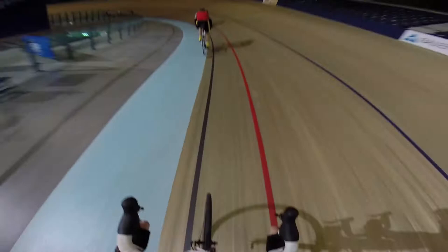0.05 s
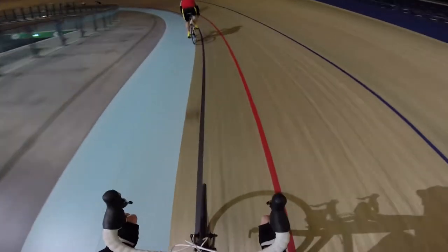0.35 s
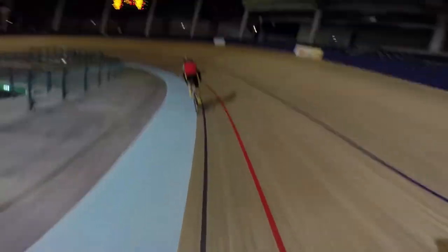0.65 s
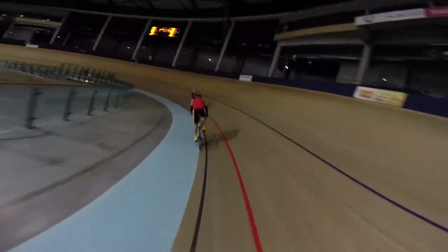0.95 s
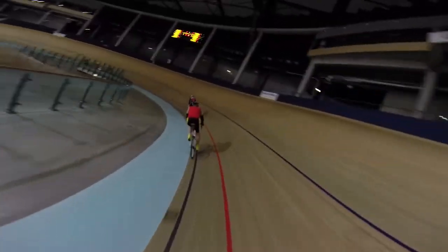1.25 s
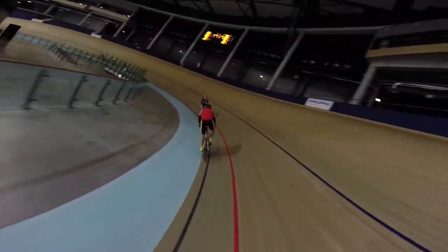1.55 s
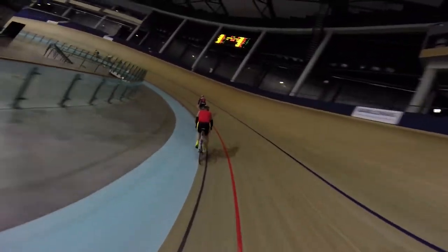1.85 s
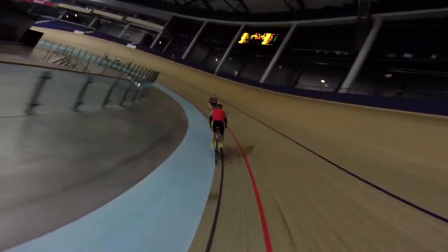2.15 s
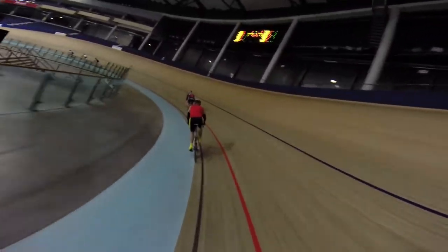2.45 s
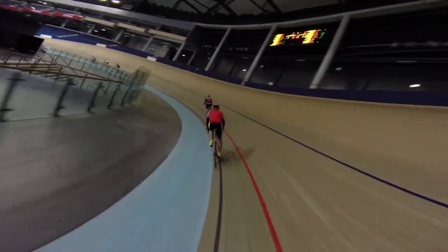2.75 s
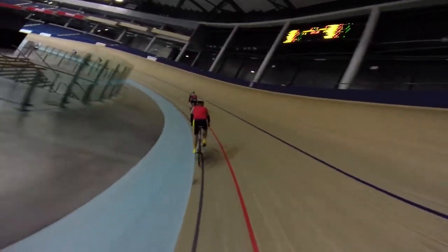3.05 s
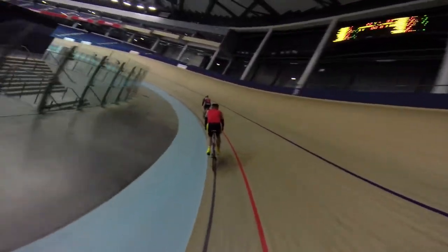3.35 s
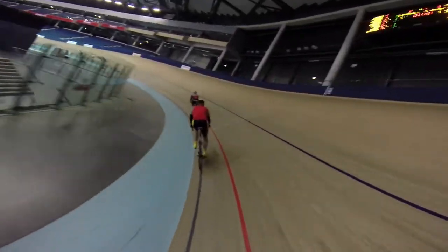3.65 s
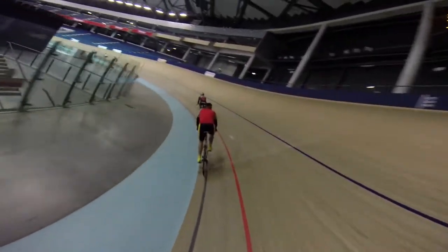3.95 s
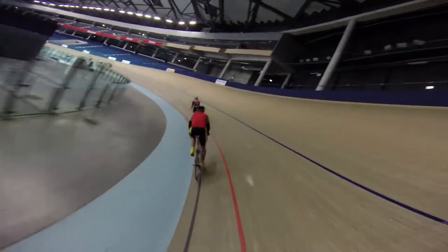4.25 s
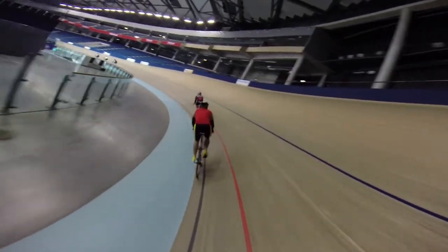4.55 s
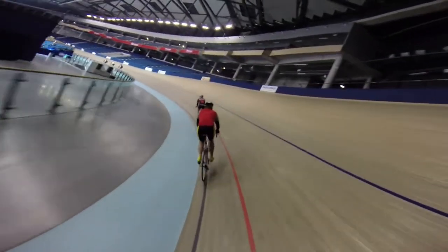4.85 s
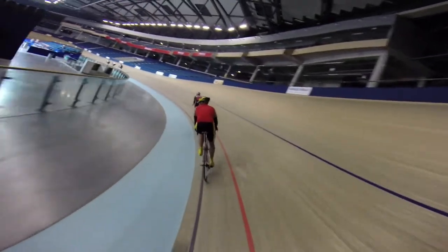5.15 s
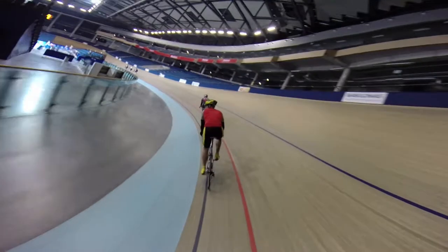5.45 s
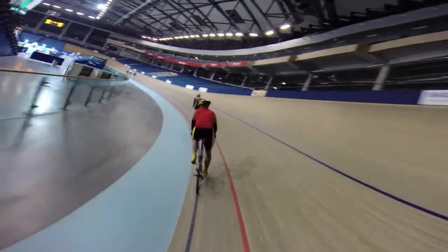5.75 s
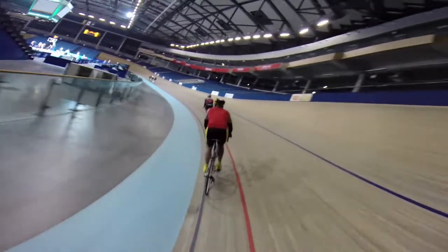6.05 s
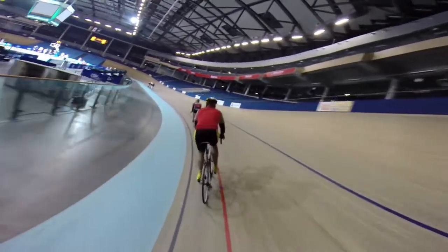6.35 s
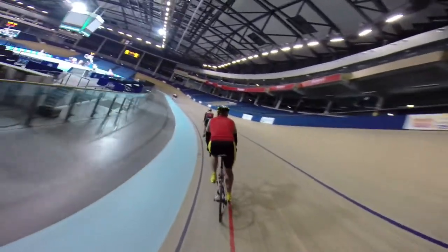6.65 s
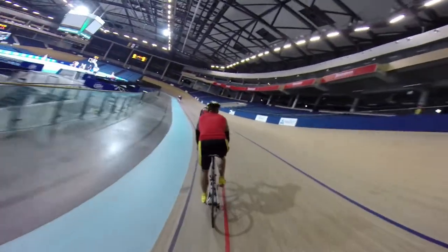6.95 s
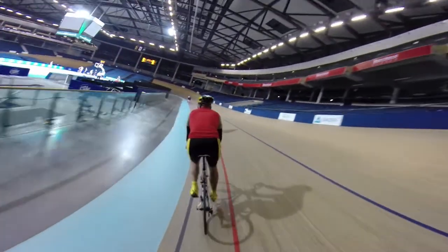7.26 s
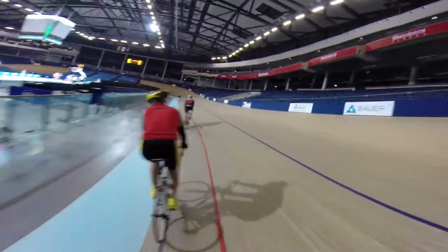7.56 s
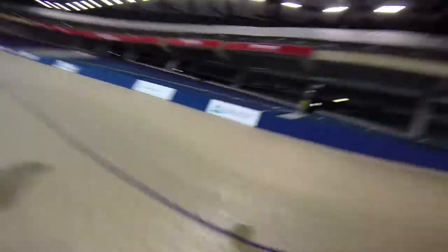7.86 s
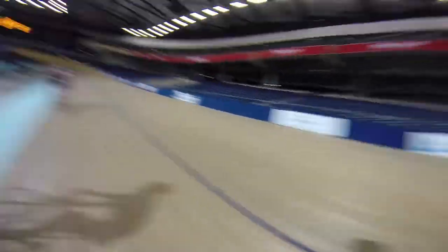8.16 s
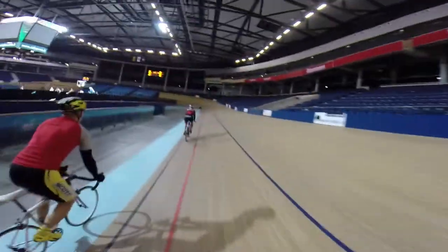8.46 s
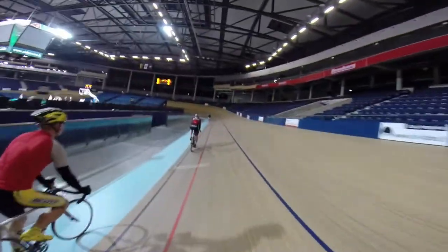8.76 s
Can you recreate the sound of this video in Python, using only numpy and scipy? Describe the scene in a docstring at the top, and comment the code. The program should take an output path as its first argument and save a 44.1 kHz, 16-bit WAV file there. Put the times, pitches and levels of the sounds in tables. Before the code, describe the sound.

Bicycle tyres roar softly on wooden boards under thumping, fluttering wind on a helmet microphone, with a few faint clicks.

```python
"""Wind buffets a helmet camera as it rides at speed round a wooden indoor cycle track.
Swirls of air thump the camera's case and flutter in its hollows. Air hisses past edges and
whistles across a gap, and it rushes brighter when the head turns.
Underneath, tyres roll on the boards, the bike ticks and squeaks faintly,
and the camera's electronics whine."""
import sys
import numpy as np
from scipy import signal
from scipy.fft import rfft, irfft, next_fast_len
from scipy.io import wavfile
from scipy.ndimage import uniform_filter1d

SR = 44100
rng = np.random.default_rng(int(sys.argv[2]) if len(sys.argv) > 2 else 0)


def inscribe(sig):
    """Save sig as 16-bit PCM at rate SR to the path in sys.argv[1].

    A 1-D sig is mono; a 2-D sig holds one channel per row.
    Samples are clipped to [-1, 1] before scaling.
    """
    pcm = np.round(np.clip(np.atleast_2d(sig).T, -1, 1) * 32767)
    wavfile.write(sys.argv[1], SR, pcm.astype(np.int16))


N = 397782
TIME = np.arange(N) / SR

# Levels in the tables are relative: the functions scale and filter them further.
# strength of the big swirls of air: time_s, level_db
SWIRL_LEVELS = [(0, -21), (.5, -27), (1.0, -23.5), (2.1, -26), (2.62, -19.5), (2.9, -27), (4.4, -23),
                (5.6, -25), (7.0, -22), (7.6, -23.5), (8.2, -20.5), (9.02, -24.5)]
# tone of the big swirls: pitch_hz, level_db
SWIRL_SPECTRUM = [(6, -6.5), (12, 1.5), (18, 9.5), (26, -5.5), (38, -6.5), (50, -8.5), (75, -18),
                  (110, -40), (250, -48)]
# boom of the case between thumps: time_s, level_db
BOOM_LEVELS = [(0, -27), (.5, -25.5), (1.65, -20), (2.08, -26.5), (2.35, -19.5), (2.9, -22), (4.4, -21.5),
               (5.0, -26), (5.3, -20.5), (5.72, -17.5), (6.05, -25), (6.45, -25), (6.85, -17.5), (7.5, -23),
               (7.95, -26), (9.02, -21.5)]
# single swirls that thump the case: time_s, level_db
CASE_THUMPS = [(.09, -15), (.33, -17), (.88, -18), (1.18, -16), (1.31, -19), (1.41, -17), (1.62, -15),
               (1.72, -13), (2.69, -10), (3.14, -16), (3.3, -18), (3.74, -14), (3.94, -19.5), (4.1, -15.5),
               (4.24, -19.5), (4.37, -12.5), (4.67, -16.5), (4.85, -14), (5.12, -17.5), (5.235, -8.5),
               (5.9, -18), (6.6, -18), (6.97, -10.5), (7.18, -23), (7.69, -15.5), (8.11, -15.5),
               (8.34, -22), (8.97, -19)]
# airflow over the hollows of the case: time_s, level_db
FLUTTER_LEVELS = [(0, -42), (.48, -36.5), (.66, -49.5), (.95, -31), (1.2, -31.5), (1.55, -35), (2.4, -35),
                  (2.62, -31), (2.85, -35), (3.1, -31.5), (4.08, -32.5), (4.45, -34), (4.9, -33.5),
                  (5.3, -32), (5.6, -34.5), (6.85, -32.5), (7.35, -38.5), (7.82, -37), (8.08, -26),
                  (8.4, -34), (8.78, -29), (9.02, -41)]
# pitches at which the hollows ring: pitch_hz, width_hz, level_db
HOLLOW_RINGS = [(1372, 151, 11), (1650, 580, -0.5), (2544, 310, 2), (3505, 350, -14.5)]
# sudden puffs into the hollows: start_s, level_db, length_s
AIR_PUFFS = [(0.266, -30, 0.013), (.825, -34.5, .035), (1.19, -30, 0.035), (1.267, -29, 0.013),
             (1.45, -34, 0.017), (1.883, -32.5, 0.037), (2.042, -26, .018), (2.133, -28, 0.027),
             (2.214, -33, .025), (2.598, -26, 0.018), (3.038, -27.5, .025), (3.192, -29, 0.011),
             (3.265, -24, .005), (3.349, -30, .014), (3.896, -28, 0.035), (4.057, -27, 0.029),
             (4.656, -30.5, .027), (5.109, -28, 0.023), (5.366, -29, 0.011), (5.698, -31, 0.019),
             (6.009, -30.5, 0.029), (6.125, -30, .022), (6.219, -31, 0.0075), (6.248, -28, 0.012),
             (6.384, -30, 0.033), (6.534, -33, 0.019), (6.651, -35, 0.018), (6.704, -27.5, 0.009),
             (6.902, -21.5, 0.018), (6.979, -30.5, 0.022), (7.087, -25.5, 0.022), (7.166, -23, 0.013),
             (7.42, -29, 0.033), (7.483, -29.5, 0.035), (7.68, -31, 0.058), (8.447, -22, .016),
             (8.55, -31, 0.021), (8.789, -29, 0.014)]
# moments when the airflow lets go of the case: time_s, depth_db, half_length_s
AIR_LULLS = [(1.33, 8, 0.016), (1.44, 8, .012), (1.538, 8, 0.012), (2.198, 7, 0.022), (3.84, 5.5, 0.024),
             (4.21, 0.5, .018), (5.065, 4.5, 0.047), (5.51, 4, 0.018), (5.982, 7, 0.015), (6.209, 7, 0.011),
             (6.324, 5.5, 0.02), (6.615, 5.5, 0.03), (6.971, 10, 0.013), (7.396, 14, 0.03), (8.504, 7, .02),
             (8.852, 5, 0.039)]
# tone of the air passing edges: pitch_hz, level_db
HISS_SPECTRUM = [(2500, 2.5), (3800, -9), (4150, 4), (4500, 7.5), (4850, -12.5), (5400, 0.5), (5900, 3.5),
                 (6300, -5.5), (6900, -10), (8000, -20.5), (12000, -32)]
# thin whistles of air across a gap: start_s, end_s, level_db
GAP_WHISTLES = [(0, .2, -51.5), (1.24, 1.55, -57), (1.97, 2.12, -56)]
# side draughts, as when the head turns: start_s, end_s, roar_db, sizzle_db
SIDE_DRAUGHTS = [(.16, 0.273, -33.5, -54), (0.38, 0.557, -35.5, -51), (0.598, 1.1, -49, -51),
                 (2.32, 2.34, -36.5, -48), (5.198, 5.382, -34.5, -56), (5.835, 5.852, -35.5, -65),
                 (7.92, 8.282, -32, -45), (8.0, 8.15, -33, -44), (8.57, 8.72, -43, -64)]
# tone of a draught's roar: pitch_hz, level_db
ROAR_SPECTRUM = [(100, 1.5), (350, -11), (600, -7.5), (1100, -2.5), (1400, -5), (1900, 0.5), (2600, -3),
                 (3100, -7.5), (3700, -17.5), (5000, -37), (9000, -49)]
# tone of a draught's sizzle: pitch_hz, level_db
SIZZLE_SPECTRUM = [(1500, -30), (3000, -12), (3700, 7.5), (4450, 6.5), (4850, -5), (6000, -6.5),
                   (6700, -25), (7150, -22), (12000, -25)]
# passing swishes of air: time_s, half_length_s, pitch_hz, width_hz, level_db
AIR_SWISHES = [(.605, .02, 4000, 400, -49), (.76, .13, 3650, 750, -44), (.53, .02, 5200, 1500, -50),
               (1.0, .09, 5800, 1100, -56), (5.32, .07, 4560, 450, -47), (5.29, .09, 5600, 1200, -46),
               (8.04, .07, 6450, 500, -51), (8.22, .06, 6450, 550, -52)]

# tyres rolling on the boards: time_s, level_db
TYRE_LEVELS = [(0, -34), (1.5, -33.5), (2.6, -33), (3.9, -32), (4.45, -34.5), (5.2, -32.5), (6.1, -32),
               (6.55, -34), (6.9, -32), (9.02, -32)]
# tone of the rolling tyres: pitch_hz, level_db
TYRE_SPECTRUM = [(40, -39), (85, 3), (110, 12.5), (134, 12.5), (165, 9.5), (200, 5.5), (280, 3), (360, 2),
                 (480, -0.5), (600, -3.5), (800, -0.5), (1000, -3.5), (1800, -3.5), (3000, -11.5),
                 (3800, -22.5), (6000, -34)]
# pitches at which the boards ring: pitch_hz, width_hz, level_db
BOARD_RINGS = [(336, 40, 0), (858, 75, 0), (930, 80, -5)]
# straights of the track, where the boards ring hollow: start_s, end_s, level_db
TRACK_STRAIGHTS = [(0, .5, -40), (.6, 1.08, -47), (7.85, 8.45, -45), (8.93, 9.02, -47)]
# wheels bumping over uneven boards: time_s, level_db
WHEEL_BUMPS = [(.277, -27.5), (1.02, -36.5)]
# tiny squeaks of the bike's drive: time_s, half_length_s, pitch_hz, width_hz, level_db
DRIVE_SQUEAKS = [(.2, .04, 10300, 700, -65), (.53, .03, 8500, 395, -61), (.657, .012, 9250, 253, -61),
                 (2.31, .012, 9450, 300, -65), (4.95, .009, 9200, 400, -64), (7.91, .035, 9350, 500, -63)]
# short runs of chirps from the chain: start_s, end_s
CHAIN_CHIRP_RUNS = [(1.635, 1.93), (4.565, 4.87)]
# ticks of chain and frame: start_s, level_db
BIKE_TICKS = [(.509, -35), (.522, -36), (.534, -36), (.907, -46), (1.14, -43), (1.325, -41), (1.977, -46),
              (2.025, -46), (2.088, -48), (2.139, -42), (2.3, -45), (2.94, -49), (3.366, -46), (3.503, -48),
              (5.172, -40), (5.185, -41), (5.638, -48), (6.567, -49), (7.577, -50)]
# pitches at which a tick rings: pitch_hz, width_hz, level_db
TICK_RINGS = [(2900, 700, -16), (4450, 500, 16.5), (5700, 640, 9.5), (7900, 2400, -1), (11500, 3000, -20)]

# steady tones of the electronics: pitch_hz, level_db
WHINE_TONES = [(5845, -73), (8781, -68), (11688, -81), (11718, -78), (14625.5, -75), (14655, -85)]
# tone of the electronics' hiss: pitch_hz, level_db
ELECTRIC_HISS_SPECTRUM = [(1000, -12.5), (6000, 7.5), (7500, 2.5), (9300, 0.5), (10500, -2.5), (12000, -5),
                          (14000, -10), (15500, -8)]
# narrow bands that the case weakens or strengthens: pitch_hz, width_hz, gain_db
CASE_BANDS = [(3780, 220, -3), (4880, 380, 4), (1833, 81, -4)]


def from_db(db):
    """Turn decibels into a gain, the number a sound is multiplied by."""
    return 10 ** (np.asarray(db) / 20)


def rms_one(x):
    """Scale a sound so that its average strength (rms) is 1."""
    return x / np.sqrt(np.mean(x ** 2) + 1e-20)


def curve(rows):
    """Join (time_s, level_db) points with straight lines."""
    times_s, levels_db = np.transpose(rows)
    return np.interp(TIME, times_s, levels_db)


def drift(per_s):
    """A smooth random wobble, about 1 in size, that changes about per_s times a second."""
    step, warm_up = 20, 2000   # one value for every 20 samples; the first values are skipped
    memory = np.exp(-2 * np.pi * per_s * step / SR)
    chance = rng.standard_normal(N // step + warm_up + 2)
    slow = signal.lfilter([1], [1, -2 * memory, memory ** 2], chance)[warm_up:]
    return np.interp(np.arange(N) / step, np.arange(len(slow)), rms_one(slow))


def cycle(per_s, peak_s):
    """A regular swing between -1 and 1."""
    return np.cos(2 * np.pi * per_s * (TIME - peak_s))


def bell(time_s, half_s):
    """A rounded hill in time that reaches 1 at time_s."""
    return np.exp(-np.minimum(((TIME - time_s) / half_s) ** 2, 20))


def humps(rows, half_s):
    """Gain of brief rounded swells, one for each (time_s, level_db)."""
    return sum(from_db(db) * bell(time_s, half_s) for time_s, db in rows)


def held(rows, rise_s, fall_s):
    """Gain of events (start_s, end_s, level_db) that rise, hold and die away."""
    power = np.zeros(N)
    for start_s, end_s, db in rows:
        outside = np.maximum((start_s - TIME) / rise_s, (TIME - end_s) / fall_s)
        power += (from_db(db) * np.exp(-np.clip(outside, 0, 20))) ** 2
    return np.sqrt(power)


def noise(spectrum):
    """Noise of strength 1 whose tone follows (pitch_hz, level_db) points."""
    size = next_fast_len(N)
    bins_hz = np.fft.rfftfreq(size, 1 / SR)
    pitch_hz, level_db = np.transpose(spectrum)
    gain = from_db(np.interp(np.log(bins_hz + 1), np.log(pitch_hz), level_db, right=-120))
    return rms_one(irfft(rfft(rng.standard_normal(size)) * gain, size)[:N])


def resonate(x, pitch_hz, width_hz):
    """Let through the part of a sound near one pitch, so that it rings there."""
    memory = np.exp(-np.pi * width_hz / SR)
    feed = np.array([1, 0, -1]) * (1 - memory ** 2) / 2
    feedback = [1, -2 * memory * np.cos(2 * np.pi * pitch_hz / SR), memory ** 2]
    return signal.lfilter(feed, feedback, x + 1e-18)


def body(x, rings):
    """Ring at several pitches at once, adding and subtracting them in turn."""
    return sum((-1) ** k * from_db(db) * resonate(x, pitch_hz, width_hz)
               for k, (pitch_hz, width_hz, db) in enumerate(rings))


def narrow_noise(pitch_hz, width_hz, size=N):
    """Noise of strength 1 held close to one pitch."""
    band = resonate(rng.standard_normal(size), pitch_hz, width_hz)
    return rms_one(resonate(band, pitch_hz, width_hz))


def swells(rows):
    """Narrow bands of noise that swell and fade."""
    sound = np.zeros(N)
    for time_s, half_s, pitch_hz, width_hz, db in rows:
        near = np.abs(TIME - time_s) < .35
        band = narrow_noise(pitch_hz, width_hz, size=near.sum())
        sound[near] += from_db(db) * band * bell(time_s, half_s)[near]
    return sound


def keep_side(x, edge_hz, side, order):
    """Keep the "low" or "high" side of edge_hz; a higher order cuts more sharply."""
    return signal.sosfilt(signal.butter(order, edge_hz, side, fs=SR, output="sos"), x)


def steady(x, span_s):
    """Even out swells longer than span_s, leaving a strength of about 1."""
    span = int(span_s * SR)
    power = uniform_filter1d(uniform_filter1d(x ** 2, span), span)
    return x / np.sqrt(power + 1e-20)


def buffeting(boom_hz, width_hz):
    """Big swirls of air shove the case, which booms on its mount, harder at each thump."""
    push = from_db(curve(BOOM_LEVELS) + 2.4 * drift(23))
    push = np.hypot(push, humps(CASE_THUMPS, half_s=.036))   # hypot adds two gains by their power
    swirls = steady(noise(SWIRL_SPECTRUM), span_s=.062)
    ring = steady(narrow_noise(boom_hz, width_hz), span_s=.07)
    boom = keep_side(from_db(-1.2) * push * ring, 84.6, "low", order=4)
    swirl_gain = from_db(curve(SWIRL_LEVELS) + 2 + .9 * drift(9.3))
    return swirl_gain * swirls + boom


def flutter(flicker_db, grain_db):
    """Ragged air rings the hollows of the case, harder in each regular surge and sudden puff."""
    surge_db = 1.35 * cycle(per_s=1.54, peak_s=.063)
    stream = from_db(curve(FLUTTER_LEVELS) + surge_db + 1.6 * drift(15))
    stream *= stalls(depth_db=1.5, lead_s=.017)
    blow = np.hypot(stream, puffs(edge_s=.0015))
    ragged_air = rng.standard_normal(N) * from_db(flicker_db * drift(37) + grain_db * drift(290))
    ring = keep_side(body(ragged_air, HOLLOW_RINGS), 3864, "low", order=18)
    ring = keep_side(ring, 640, "high", order=2)
    return blow * steady(ring, span_s=.029)


def tyres(straight_gain, flicker_db):
    """Tyres on the grain of the wood make a soft roar that grows on the straights."""
    gain = np.hypot(from_db(curve(TYRE_LEVELS)), from_db(5.5) * straight_gain)
    return gain * from_db(flicker_db * drift(12.6)) * noise(TYRE_SPECTRUM)


def boards(straight_gain, flicker_db):
    """The boards ring hollow under the wheels, along the straights and at bumps."""
    ring = sum(from_db(db) * narrow_noise(pitch_hz, width_hz) for pitch_hz, width_hz, db in BOARD_RINGS)
    rolling = straight_gain * from_db(flicker_db * drift(22))
    return np.hypot(rolling, humps(WHEEL_BUMPS, half_s=.01)) * ring


def edge_hiss(roar_gain, base_db, flicker_db):
    """Tiny swirls hiss at the edges of helmet and case, swelling with the pedals and in draughts."""
    pedal_db = 2.5 * cycle(per_s=1.44, peak_s=.31)
    gain = np.hypot(from_db(base_db + pedal_db), from_db(-13) * roar_gain)
    return gain * from_db(flicker_db * drift(55)) * noise(HISS_SPECTRUM)


def whistle(pitch_hz, width_hz, flicker_db):
    """Air blowing across a gap makes a thin, unsteady whistle."""
    gain = held(GAP_WHISTLES, rise_s=.05, fall_s=.05)
    return gain * from_db(flicker_db * drift(25)) * narrow_noise(pitch_hz, width_hz)


def electronics(hiss_db):
    """The camera's electronics give a steady whine over a faint hiss."""
    whine = sum(from_db(db) * np.sqrt(2) * np.sin(2 * np.pi * (pitch_hz * TIME + rng.random()))
                for pitch_hz, db in WHINE_TONES)
    hiss = from_db(hiss_db + 1.25 * drift(16)) * noise(ELECTRIC_HISS_SPECTRUM)
    return from_db(-2.5) * whine + hiss


def draughts(rise_s, fall_s):
    """Air strikes from the side as the head turns: one gain for its roar, one for its sizzle."""
    roars = [(start_s, end_s, db) for start_s, end_s, db, _ in SIDE_DRAUGHTS]
    sizzles = [(start_s, end_s, db) for start_s, end_s, _, db in SIDE_DRAUGHTS]
    return held(roars, rise_s, fall_s), held(sizzles, rise_s, fall_s)


def side_rush(roar_gain, sizzle_gain, flicker_db):
    """Side-on to the wind, the case makes a broad roar with a sizzle on top."""
    roar = roar_gain * from_db(flicker_db * drift(58)) * noise(ROAR_SPECTRUM)
    sizzle = sizzle_gain * from_db(2.6 * drift(60)) * noise(SIZZLE_SPECTRUM)
    return roar + sizzle


def squeaks():
    """The bike's drive gives tiny, high squeaks."""
    return swells(DRIVE_SQUEAKS)


def stalls(depth_db, lead_s):
    """The airflow stalls just before each puff: a gain that sinks, then snaps back."""
    ahead = sum((TIME < start_s) * bell(start_s, lead_s) for start_s, _, _ in AIR_PUFFS)
    return from_db(-depth_db * ahead)


def puffs(edge_s):
    """Air puffs into the hollows: a gain that jumps up, holds and falls away."""
    gain = np.zeros(N)
    for start_s, db, length_s in AIR_PUFFS:
        full_s = start_s + edge_s
        corners_s = [start_s - edge_s, full_s, full_s + length_s / 2, full_s + length_s * 2.3]
        gain += from_db(db) * np.interp(TIME, corners_s, [0, 1, 1, 0])
    return gain


def ticks(decay_s):
    """Each tick of chain or frame is a short crackle that rings brightly in the bike."""
    gain = sum(from_db(db) * (TIME >= start_s) * np.exp(-np.abs(TIME - start_s) / decay_s)
               for start_s, db in BIKE_TICKS)
    return gain * rms_one(body(rng.standard_normal(N), TICK_RINGS))


def swishes():
    """Passing air makes brief, high swishes."""
    return swells(AIR_SWISHES)


def lulls():
    """The airflow lets go of the case for a moment: a gain of 1 that dips in each lull."""
    dip_db = sum(depth_db * np.exp(-((TIME - time_s) / half_s) ** 4)
                 for time_s, depth_db, half_s in AIR_LULLS)
    return from_db(-dip_db)


def chain_chirps(gap_s, half_s, pitch_hz, width_hz, level_db):
    """The chain chirps in short, evenly spaced runs."""
    return swells([(time_s, half_s, pitch_hz, width_hz, level_db)
                   for start_s, end_s in CHAIN_CHIRP_RUNS
                   for time_s in np.arange(start_s, end_s, gap_s)])


def through_case(x):
    """The case colours the sound, dulling two narrow bands and lifting one."""
    for pitch_hz, width_hz, gain_db in CASE_BANDS:
        x = x - (1 - from_db(gain_db)) * resonate(x, pitch_hz, width_hz)
    return x


def scene():
    """Wind and bike are heard through the case, with the electronics added, in one channel."""
    lull_gain = lulls()
    roar_gain, sizzle_gain = draughts(rise_s=.048, fall_s=.026)
    straight_gain = held(TRACK_STRAIGHTS, rise_s=.19, fall_s=.19)
    track = tyres(straight_gain, flicker_db=1) * np.sqrt(lull_gain)   # dips half as many decibels
    track += boards(straight_gain, flicker_db=1.7)
    wind = lull_gain * flutter(flicker_db=1.5, grain_db=2)
    wind += buffeting(boom_hz=61.9, width_hz=24)
    wind += side_rush(roar_gain, sizzle_gain, flicker_db=3)
    wind += edge_hiss(roar_gain, base_db=-54.5, flicker_db=2)
    wind += whistle(pitch_hz=4420, width_hz=310, flicker_db=2.5)
    wind += swishes()
    bike = ticks(decay_s=.0045) + squeaks()
    bike += chain_chirps(gap_s=.067, half_s=.012, pitch_hz=10200, width_hz=700, level_db=-65)
    return (through_case(wind + track + bike) + electronics(hiss_db=-59))[None]


def record(dry):
    """The sound eases in and out very quickly, and the highest treble is cut steeply."""
    ease_s, cutoff_hz = .003, 14850
    ease = np.clip(np.minimum(TIME, TIME[-1] - TIME) / ease_s, 0, 1)
    treble_cut = signal.ellip(10, .1, 90, cutoff_hz, fs=SR, output="sos")
    return signal.sosfilt(treble_cut, dry * ease)


dry = scene()
out = record(dry)
inscribe(out)
```